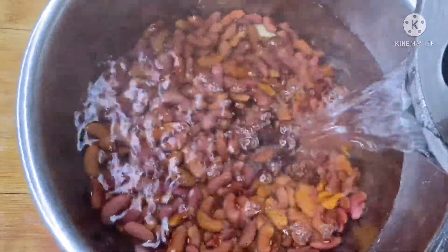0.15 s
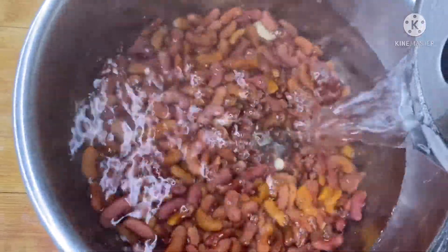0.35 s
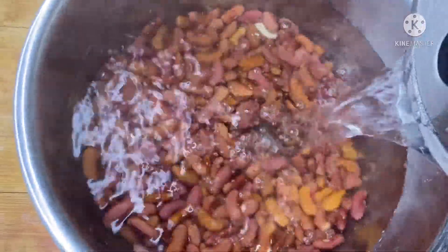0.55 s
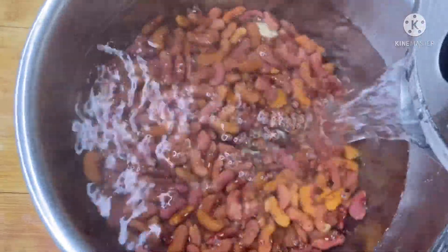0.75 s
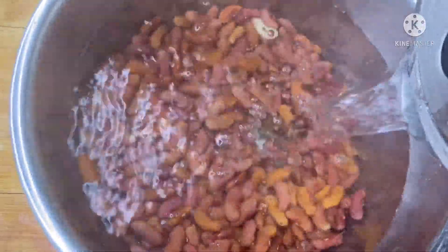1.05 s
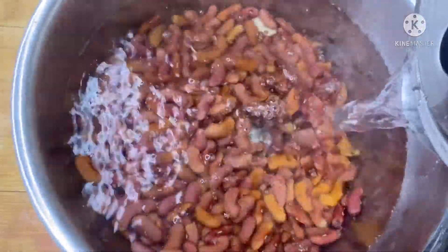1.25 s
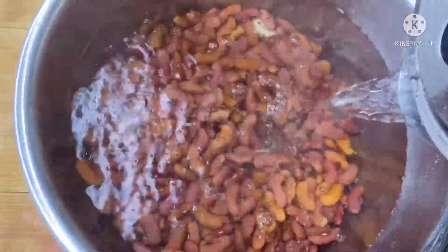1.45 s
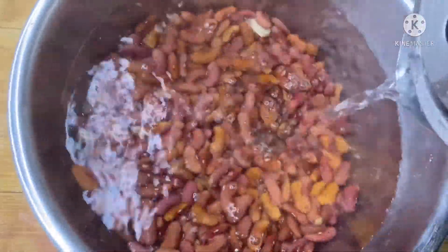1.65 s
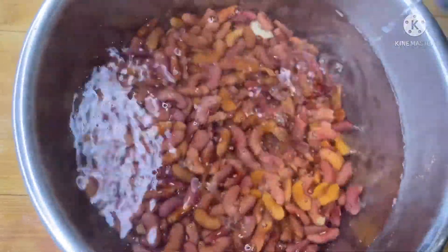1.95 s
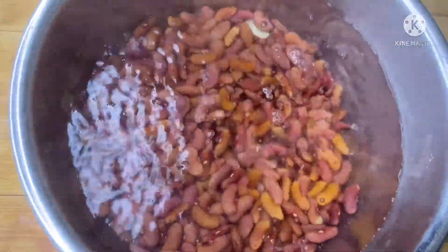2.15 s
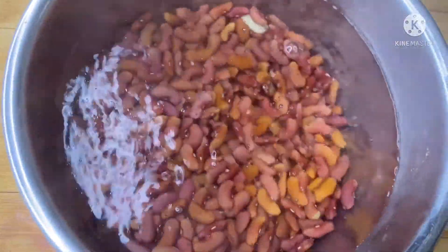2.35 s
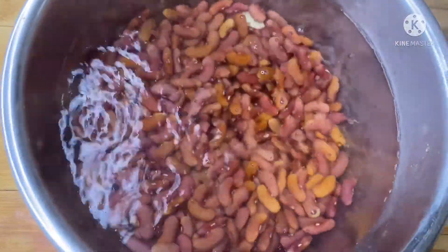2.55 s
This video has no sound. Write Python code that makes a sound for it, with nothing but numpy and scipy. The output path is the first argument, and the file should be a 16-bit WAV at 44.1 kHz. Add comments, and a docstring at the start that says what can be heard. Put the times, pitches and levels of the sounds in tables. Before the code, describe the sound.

Hot water pouring onto dry beans in a metal pot, fizzing and plopping, then one hard knock

```python
"""Hot water runs from a kettle onto dry beans in a metal pot, close to the microphone in a small kitchen.
Crowds of tiny clicks make the fizz, short noise puffs the spits, swinging air pockets the plops.
The pour thins out towards a few last drops, which ping as short decaying tones.
Light clunks and, near the end, one hard knock ring as decaying modes of the metal.
An appliance hum, low rumble, the pot wall and the room's reverberation surround them."""
import sys
import numpy as np
from scipy import signal
from scipy.fft import rfft, irfft
from scipy.io import wavfile

SR = 44100
rng = np.random.default_rng(int(sys.argv[2]) if len(sys.argv) > 2 else 0)


def dump(signal):
    """Clip the signal to [-1, 1] and save it as 16-bit WAV at the path in sys.argv[1]."""
    limited = np.clip(np.atleast_2d(signal).T, -1, 1)
    pcm = np.round(limited * 32767).astype(np.int16)
    wavfile.write(sys.argv[1], SR, pcm)


N = 119070
T = np.arange(N) / SR  # time in s
HZ = np.fft.rfftfreq(N, 1 / SR)  # frequency of each spectrum bin
EDGE_HZ = 16000  # upper band limit; also the highest fizz pitch

# air pockets plopping between the beans: start_s [s], level_db [dB], pitch_hz [Hz] once settled
PLOPS = [(.0255, -39, 2090), (.059, -38, 1710), (.0712, -41, 1940), (.1628, -40, 1560), (.176, -30, 1160),
         (0.1958, -37, 2130), (.2065, -38.5, 850), (0.2404, -32.5, 1670), (.266, -38.5, 1980),
         (.2832, -35.5, 2000), (0.3496, -38.5, 980), (.3752, -33.5, 1380), (0.3796, -31, 1150),
         (.3934, -31, 1660), (0.4227, -39, 1210), (0.4454, -35, 1070), (.528, -38, 3470), (.543, -35, 1250),
         (0.5691, -35.5, 1570), (.599, -47, 1270), (0.6696, -40, 940), (0.7263, -32.5, 1370),
         (0.7996, -41.5, 1280), (1.3027, -40, 2080), (1.459, -39, 2230), (1.594, -45, 2010),
         (1.804, -42, 1840), (1.9055, -42, 1900), (1.9232, -27, 1184), (1.9525, -30.5, 1270),
         (2.0368, -37.5, 2140), (2.1015, -43.5, 2330)]
# colour of tearing water, also of the tick that opens a clunk: freq_hz [Hz], gain_db [dB]
SPLASH_SHAPE = [(300, -30), (750, 7.5), (2000, 9.5), (3200, -2), (6000, -1.5), (16000, -36)]


def amp(db):
    """Turns decibels into a gain."""
    return 10 ** (np.asarray(db) / 20)


def unit(x):
    """Scales a sound to rms 1, over all its channels together."""
    return x / np.sqrt(np.mean(x ** 2) + 1e-20)


def read(points, hz):
    """Reads a table of (Hz, value) along a log-frequency axis."""
    freq_hz, value = np.transpose(points)
    return np.interp(np.log(hz + 1), np.log(freq_hz + 1), value)


def colour(x, shape):
    """Filters a sound by a table of (Hz, dB) without shifting its phase."""
    return irfft(rfft(x) * amp(read(shape, HZ)), N)


def add(mix, start_s, sound):
    """Mixes a sound in at a time."""
    part = mix[max(round(start_s * SR), 0):][:len(sound)]
    part += sound[:len(part)]


def placed(x, lean_db):
    """Leans a sound to the left (positive) or right; two channels."""
    return np.array([amp(lean_db) * x, amp(-lean_db) * x])


def burst(scale_s):
    """A very short puff of noise that swells and dies."""
    age = T[:SR // 40] / scale_s
    return rng.standard_normal(len(age)) * 2 * age * np.exp(-1.4 * age)


def dying(start_s, db, t60_s):
    """A level that starts at a time and dies away by 60 dB per t60."""
    age = np.maximum(T - start_s, 0)
    return np.minimum(age / 0.00033, 1) * amp(db - 60 * age / t60_s)


def clicks(per_s, scatter_db):
    """Single-sample clicks at random times, of uneven size and either sign."""
    size = amp(scatter_db * np.minimum(rng.exponential(1, N), 5))
    sign = rng.choice([-1, 1], N)
    return size * sign * (rng.random(N) < per_s / SR)


def crackle(per_s, scatter_db, shape):
    """A steady crowd of coloured clicks, rms 1."""
    return unit(colour(clicks(per_s, scatter_db), shape))


def bump(db, hz, t60_s):
    """One decaying resonance, pushed softly so that it takes part of a cycle to build up."""
    rise_cycles = 0.31
    t = T[:SR // 2]
    swing = amp(db - 60 * t / t60_s) * (1 - np.exp(-t * hz / rise_cycles))
    return swing * np.sin(2 * np.pi * hz * t)


def ring(modes, rise_cycles, lag_cycles):
    """Decaying modes after one blow; low ones build up more slowly, neighbours swing in opposite directions."""
    out = 0
    for k, (hz, db, t60_s) in enumerate(modes):
        t = np.maximum(T[:SR // 2] - lag_cycles / hz, 0)
        rise = 1 - np.exp(-t * hz / rise_cycles)
        out = out + (-1) ** k * rise * amp(db - 60 * t / t60_s) * np.sin(2 * np.pi * hz * t)
    return out


def flow_db():
    """Strength of the pour at every sample, in dB."""
    # strength of the pour: time_s [s], strength_db [dB]
    flow_points = [(0, -0.5), (.3, 0), (.55, 2), (.85, -3), (1.2, -2.5), (1.55, -3.5), (1.8, -5.5),
                   (2.1, -5), (2.3, -7.5), (2.7, -9)]
    return np.interp(T, *np.transpose(flow_points))


def fizz():
    """Tiny bubbles burst all the time, each a brief tick around its own pitch; rms 1."""
    # colour of the fizz: freq_hz [Hz], gain_db [dB]
    fizz_shape = [(400, 1.5), (1500, -4.5), (3500, -8), (6000, 2), (10000, 3), (16000, -1)]
    width_hz = 1370  # spread of one tick around its pitch
    sizes = clicks(per_s=3400, scatter_db=4.5)
    pitches = np.linspace(1000, EDGE_HZ, 10)
    kind = rng.integers(0, len(pitches), N)
    ticks = 0
    for k, hz in enumerate(pitches):
        band = np.exp(-.5 * ((HZ - hz) / width_hz) ** 2)
        ticks = ticks + rfft(sizes * (kind == k)) * band
    return unit(colour(irfft(ticks, N), fizz_shape))


def spray():
    """Fizz and smooth hiss of the wetted beans follow the flow; spray and bursting bubbles spit sharply."""
    # sharp spits: start_s [s], level_db [dB] before halving and colouring
    spit_events = [(0.0198, -31), (0.0267, -31), (.094, -26.5), (.15, -33.5), (0.1763, -30), (0.1949, -32),
                   (0.2202, -31), (0.2837, -29), (0.287, -34), (0.334, -34.5), (0.3934, -26.5),
                   (.467, -31.5), (.5435, -37.5), (0.7266, -34.5), (.7998, -37), (0.7537, -37),
                   (1.4587, -34), (1.4845, -34.5), (1.9049, -32), (2.0115, -34), (2.0373, -30.5),
                   (2.5085, -36.5), (2.573, -35.5)]
    # colour of the spits: freq_hz [Hz], gain_db [dB]
    spit_shape = [(500, -4), (2000, 3), (5000, 2), (10000, 8), (16000, 4)]
    # colour of the hiss: freq_hz [Hz], gain_db [dB]
    hiss_shape = [(300, -8), (700, 9), (1100, 4.5), (2200, 2), (3500, -4.5), (5500, -2), (10000, -4),
                  (16000, -4)]
    fizz_db, hiss_db = -58.5, -62  # rms at a flow of 0 dB
    hiss_follow = 0.23  # dB of hiss per dB of flow
    spits, flow = np.zeros(N), flow_db()
    for start_s, db in spit_events:
        add(spits, start_s, amp(db) * burst(0.00067) / 2)
    hiss = amp(hiss_db + hiss_follow * flow) * unit(colour(rng.standard_normal(N), hiss_shape))
    return colour(spits, spit_shape) + amp(fizz_db + flow) * fizz() + hiss


def far_fizz():
    """Diffuse fizz thrown back from all sides, unlike at the two microphone ports."""
    # colour of the diffuse fizz: freq_hz [Hz], gain_db [dB]
    far_shape = [(100, -15), (400, 4), (2000, 3), (3500, -2.5), (6000, -16), (16000, -1.5)]
    far_db, follow = -67.5, 0.23  # rms at a flow of 0 dB; dB per dB of flow
    noise = unit(colour(rng.standard_normal((2, N)), far_shape))
    return amp(far_db + follow * flow_db()) * noise


def background():
    """Low room rumble as coloured noise, and an appliance hum as one steady sine."""
    # colour of the rumble: freq_hz [Hz], gain_db [dB]
    rumble_shape = [(20, -25), (45, -3), (65, -4), (100, -4), (160, -4), (240, -8), (340, -7.5),
                    (450, -14.5), (700, -12), (1000, -27.5), (3000, -40), (16000, -52)]
    hum_hz, hum_db, rumble_db = 60, -57, -53.5
    rumble = amp(rumble_db) * unit(colour(rng.standard_normal(N), rumble_shape))
    return rumble + amp(hum_db) * unit(np.sin(2 * np.pi * hum_hz * T))


def gurgle():
    """Uneven surging of the stream: noise below 35 Hz, rms 1."""
    return unit(irfft(rfft(rng.standard_normal(N)) * (HZ < 35), N))


def plop(db, hz):
    """An air pocket swings a few times, its pitch starting high and settling as it closes."""
    swell_cycles = 0.9  # cycles to full swing
    sag, sag_cycles = 0.44, 0.44  # extra pitch at the start, as a fraction; cycles it takes to settle
    t = T[:SR // 50]
    swing = t * hz / swell_cycles
    turns = np.cumsum(hz * (1 + sag * np.exp(-t * hz / sag_cycles))) / SR
    return amp(db) * swing * np.exp(1 - swing) * np.sin(2 * np.pi * turns)


def bubbles():
    """The large plops, and clumps of small ones that thin out with the flow; two channels."""
    small_per_s, small_db = 300, -56.5  # at a flow of 0 dB; level_db of the smallest
    middle_hz, pitch_spread, scatter_db = 1620, 0.414, 3.3  # spread is in natural log of pitch
    gurgle_db, pan_db = 2, 0.7  # depth of the clumping; widest lean, as plops land all over the pot
    out, flow = np.zeros((2, N)), flow_db()
    chance, pitch = rng.random(N), rng.standard_normal(N)
    size = np.minimum(rng.exponential(1, N), 3)
    per_s = small_per_s * amp(flow + gurgle_db * gurgle())
    level_db = small_db + flow + scatter_db * size
    pitch_hz = middle_hz * np.exp(pitch_spread * pitch)
    small = [(T[i], level_db[i], pitch_hz[i]) for i in np.flatnonzero(chance < per_s / SR)]
    for start_s, db, hz in list(PLOPS) + small:
        lean_db = pan_db * rng.uniform(-0.82, 1)
        add(out[0], start_s, plop(db + lean_db, hz))
        add(out[1], start_s, plop(db - lean_db, hz))
    return out


def splashes():
    """Water tears wetly at each large plop, and the stream surges once as a dying crackle."""
    splash_db = -12  # relative to its plop, before colouring
    out = np.zeros(N)
    for start_s, db, _ in PLOPS:
        add(out, start_s, amp(db + splash_db) * burst(0.0017))
    surge = dying(.467, db=-45, t60_s=0.22) * crackle(per_s=2000, scatter_db=4.0, shape=SPLASH_SHAPE)
    return colour(out, SPLASH_SHAPE) + surge


def handling():
    """Light clunks of metal, each ringing a little differently, and dull bumps of handling; two channels."""
    # light clunks of the metalware: start_s [s], level_db [dB]
    clunk_events = [(1.1305, -34), (1.1922, -37.5), (1.5135, -34.5), (.4657, -39.5)]
    # what a clunk rings with: freq_hz [Hz], level_db [dB] relative to the clunk, t60_s [s]
    clunk_modes = [(167.3, -2, 0.1), (736, 0.5, 0.056), (1150, -6, 0.023), (1342, 0.5, .03),
                   (1538, -6, 0.025), (2024, -4.5, 0.029), (2357, -11, 0.026)]
    # dull bumps while the kettle is tipped: start_s [s], level_db [dB], pitch_hz [Hz], t60_s [s]
    bump_events = [(.467, -31.5, 381, 0.051), (.469, -38.5, 144, 0.15), (.474, -36.5, 101, 0.11),
                   (.50, -46, 42, .25), (.645, -43, 372, .06), (0.692, -37.5, 45, .22),
                   (.728, -45, 143.8, 0.17), (1.417, -36, 354, 0.03), (1.422, -37.5, 154, .12),
                   (1.626, -35, 55, 0.29)]
    detune = 0.018  # largest shift as a fraction of pitch: each blow lands on another spot
    tick_db, lean_db = -5.5, 1.1  # tick relative to its clunk, before colouring; lean to the left
    metal, ticks, bumps = np.zeros(N), np.zeros(N), np.zeros(N)
    for start_s, db in clunk_events:
        modes = [(hz * (1 + detune * rng.uniform(-1, 1)), level, t60_s) for hz, level, t60_s in clunk_modes]
        add(metal, start_s, amp(db) * ring(modes, rise_cycles=0.96, lag_cycles=1.407))
        add(ticks, start_s, amp(db + tick_db) * burst(0.0043))
    for start_s, *row in bump_events:
        add(bumps, start_s, bump(*row))
    return placed(metal + colour(ticks, SPLASH_SHAPE), lean_db) + bumps


def pings():
    """The last drops make short, clear decaying tones, slightly to the right."""
    # last drops: start_s [s], level_db [dB], pitch_hz [Hz], t60_s [s]
    ping_events = [(2.0371, -34.5, 2956, .014), (2.08, -42, 3050, .011)]
    out = np.zeros(N)
    for start_s, *row in ping_events:
        add(out, start_s, bump(*row))
    return placed(out, lean_db=-1.7)


def thump(start_s):
    """The body of the knock: a decaying sine that falls steeply in pitch, so its low notes arrive last."""
    # colour of the thump: freq_hz [Hz], gain_db [dB]
    thump_shape = [(40, 1.8), (150, 6.5), (300, -4), (420, -12.5), (560, -9.5), (730, 1.7), (1000, 3)]
    from_hz, to_hz, fall_s, steepness = 758, 52.2, 0.0097, 4.86
    level_db, t60_s, rise_s = -14, .15, .0015  # level before colouring
    out, t = np.zeros(N), T[:SR // 2]
    hz = to_hz + (from_hz - to_hz) / (1 + (t / fall_s) ** steepness)
    swing = amp(level_db - 60 * t / t60_s) * (1 - np.exp(-t / rise_s))
    add(out, start_s, swing * np.sin(2 * np.pi * np.cumsum(hz) / SR))
    return colour(out, thump_shape)


def knock():
    """One hard blow: a noise crack, ringing modes, a falling thump, a deep boom and a rattle of the beans."""
    # what the knock rings with: freq_hz [Hz], level_db [dB], t60_s [s]
    knock_modes = [(139.3, -25, 0.31), (322, -32, 0.23), (545.6, -21.5, 0.1), (615, -34, 0.23),
                   (743, -23, 0.08), (1060, -23, .049), (1458, -26, 0.058), (1770, -31, 0.05),
                   (1900, -30, 0.032), (2020, -29.5, 0.037), (2465, -33, .05), (2750, -35.5, 0.082)]
    # thin overtones of the pot wall that linger: freq_hz [Hz]
    shell_hz = [1184, 1444, 1784, 1880, 1986, 2315, 2560, 2630, 2770, 3040]
    # colour of the crack: freq_hz [Hz], gain_db [dB]
    crack_shape = [(300, -14.5), (900, 12), (1500, 11.5), (2000, 15.5), (2600, 8), (3500, -3.5), (5000, 4),
                   (7000, -3), (10000, -1.5), (16000, -8)]
    # colour of the rattle: freq_hz [Hz], gain_db [dB]
    rattle_shape = [(200, -11), (1000, -0.5), (1600, 1.5), (2200, -2), (2950, 4.5), (3700, -6.5),
                    (5500, -14), (16000, -26)]
    knock_s = 2.3635  # the other parts start at their own delays after this
    crack = np.zeros(N)
    add(crack, knock_s + 0.001405, amp(-16.5) * burst(0.0014))
    out = colour(crack, crack_shape)
    shell = [(hz, -51, 0.34) for hz in shell_hz]  # level in dB, t60 in s
    add(out, knock_s, ring(list(knock_modes) + shell, rise_cycles=1.4, lag_cycles=0))
    out = out + thump(knock_s)
    add(out, knock_s + 0.0572, bump(db=-27, hz=42.5, t60_s=0.35))  # boom
    rattle = crackle(per_s=1500, scatter_db=0.5, shape=rattle_shape)
    return out + dying(knock_s + 0.012, db=-37.5, t60_s=0.26) * rattle


def spread(pair, apart_hz):
    """Reflections are alike at both ports in the bass and differ higher up."""
    side = irfft(rfft(pair[1]) * HZ / np.hypot(HZ, apart_hz), N)
    return np.array([pair[0] + side, pair[0] - side]) / np.sqrt(2)


def kitchen(x):
    """A diffuse noise tail, each band dying at its own speed, stands for the room."""
    # reverberation time: freq_hz [Hz], t60_s [s]
    room_t60 = [(60, 0.45), (200, 0.52), (700, 0.36), (1500, 0.34), (3000, 0.43), (6000, 0.22),
                (16000, 0.14)]
    # colour of the reverberation: freq_hz [Hz], gain_db [dB]
    room_colour = [(40, -4), (150, 7), (400, 7), (700, 3), (1200, -0.5), (2900, -0.5), (4500, -0.5),
                   (8000, -18), (16000, -7)]
    hz, t, bands = signal.stft(rng.standard_normal((2, SR)), SR, nperseg=256)
    fade = amp(-60 * t / read(room_t60, hz)[:, None])
    tail = signal.istft(bands * fade, SR, nperseg=256)[1][:, :SR]
    tail = tail * np.clip(T[:SR] / 0.0037 - 1, 0, 1)  # silent for 3.7 ms, then fades in
    wet = signal.fftconvolve(x[None], tail / np.linalg.norm(tail[0]), axes=1)[:, :N]
    return spread(colour(wet, room_colour), apart_hz=1100)


def pot(x):
    """Quick reflections from the pot wall: short noise scatter with its bass rolled off."""
    pot_db, scatter_s = -8.5, 0.0024
    taps = np.array([burst(scatter_s), burst(scatter_s)]) * np.minimum(T[:SR // 40] / 0.0027, 1)
    wet = signal.fftconvolve(x[None], taps / np.linalg.norm(taps[0]), axes=1)[:, :N]
    thinned = irfft(rfft(wet) * HZ / np.hypot(HZ, 800), N)
    return amp(pot_db) * spread(thinned, apart_hz=500)


def ports(x):
    """Direct sound reaches the left port slightly before the right, as a phase lead at each frequency."""
    # lead of the left microphone port over the right: freq_hz [Hz], lead_rad [radians]
    port_lead = [(0, 0), (550, 0.97), (1000, 1), (1700, 0), (3400, 1), (5000, 0.6), (7100, 3), (16000, 12)]
    turn = np.exp(1j * np.interp(HZ, *np.transpose(port_lead)) / 2)  # half the lead on each side
    return irfft(rfft(x) * np.array([turn, 1 / turn]), N)


def scene():
    """The pour, the handling and the knock in the pot and the kitchen."""
    pour_wet_db, clunk_wet_db, knock_wet_db = -16.5, -13.5, -15.5  # sends to the reverberation
    pour = bubbles() + pings() + splashes() + spray()
    clunks, hit = handling(), knock()
    direct = pour + clunks + hit
    sent = amp(pour_wet_db) * pour.mean(0) + amp(clunk_wet_db) * clunks.mean(0) + amp(knock_wet_db) * hit
    return ports(direct + background()) + pot(direct.mean(0)) + kitchen(sent) + far_fizz()


def record(dry):
    """The recorder's bass roll-off and band limit."""
    low_cut_hz = 29
    dry = irfft(rfft(dry) * HZ ** 4 / (HZ ** 4 + low_cut_hz ** 4), N)
    low_pass = signal.firwin(201, EDGE_HZ, window=("kaiser", 8), fs=SR)
    return signal.oaconvolve(dry, low_pass[None], "same")


dry = scene()
out = record(dry)
dump(out)
```